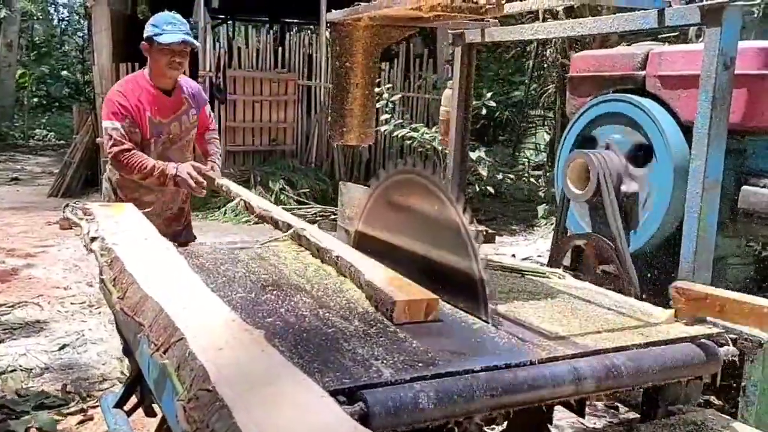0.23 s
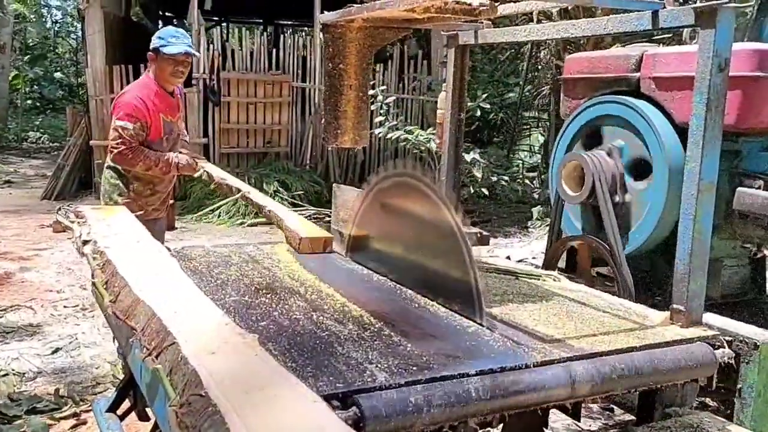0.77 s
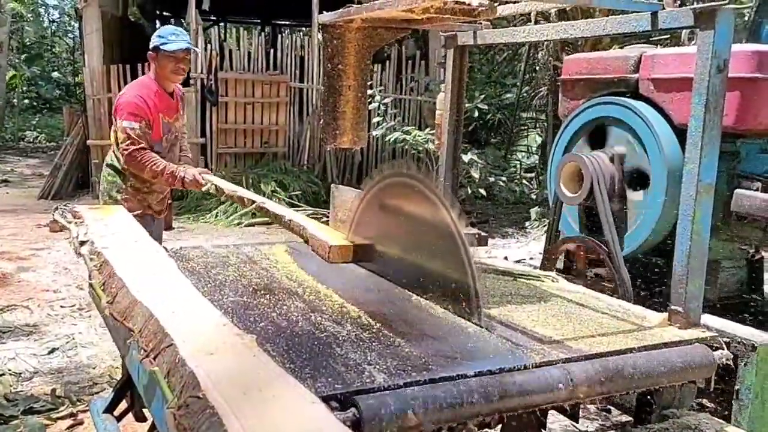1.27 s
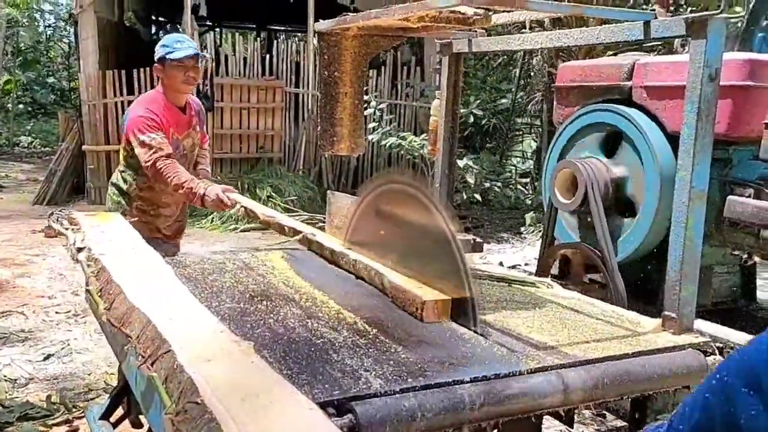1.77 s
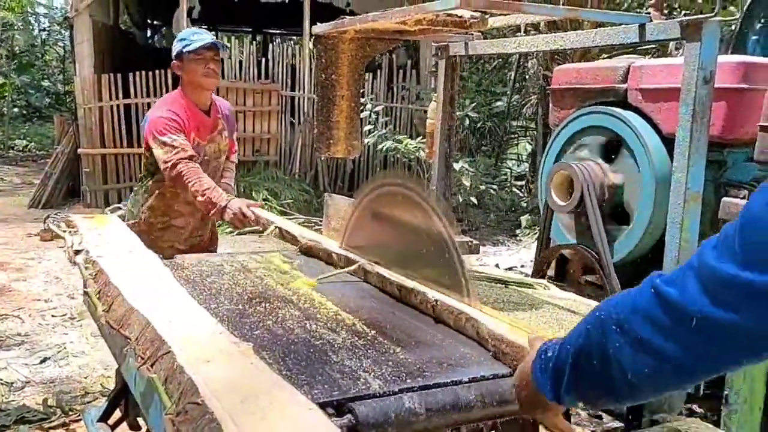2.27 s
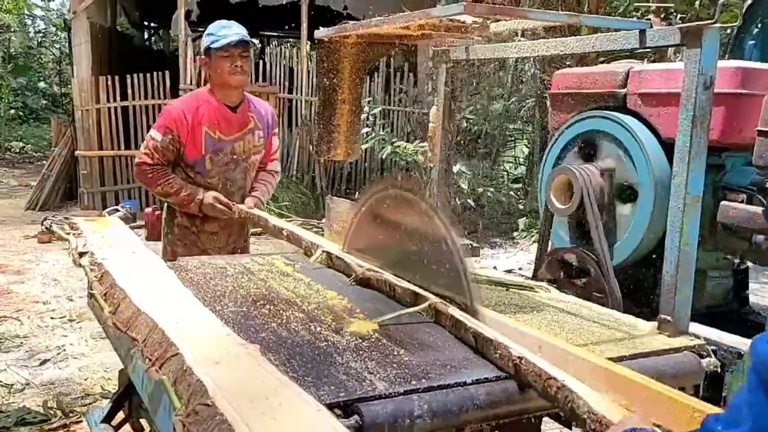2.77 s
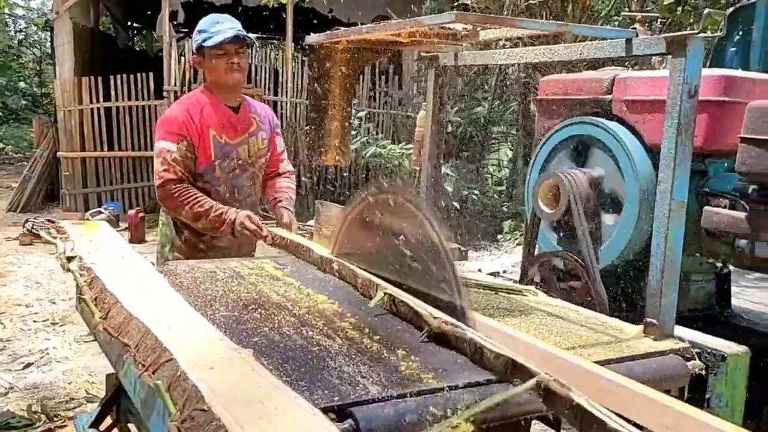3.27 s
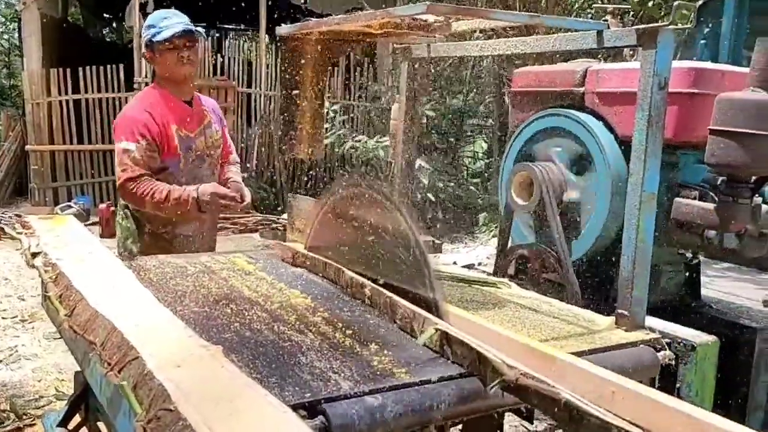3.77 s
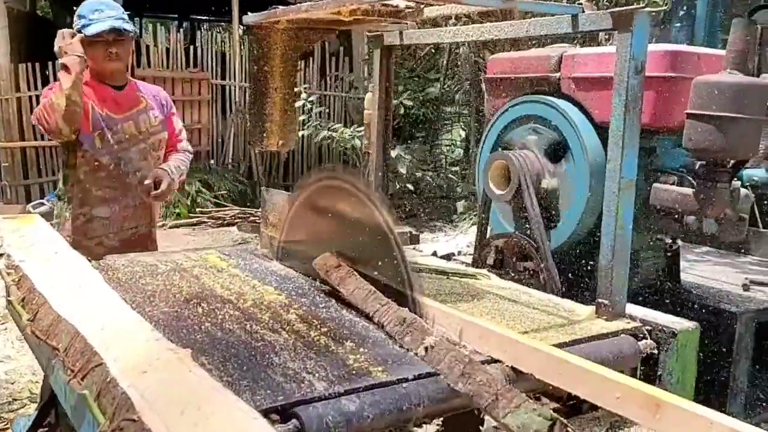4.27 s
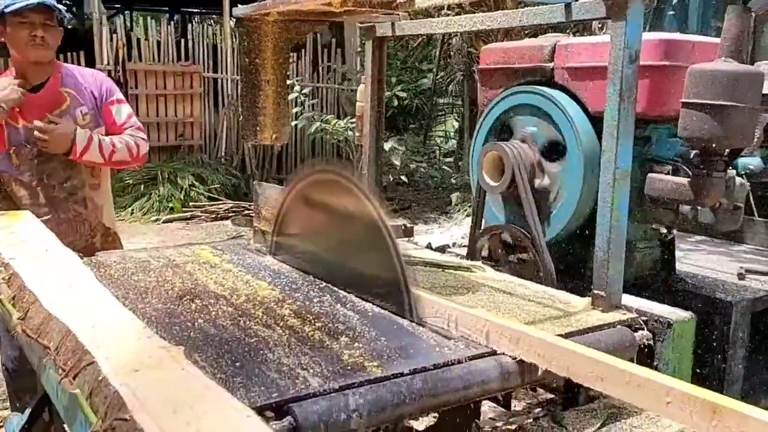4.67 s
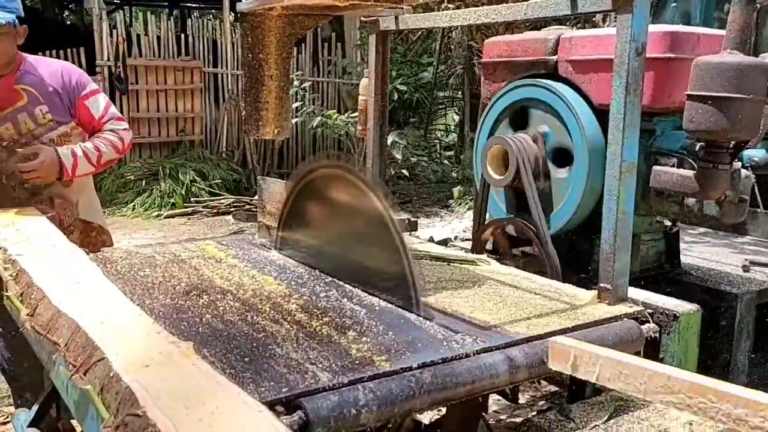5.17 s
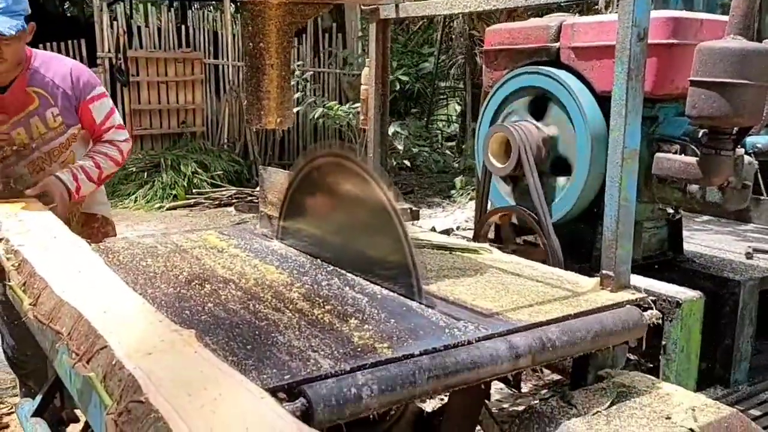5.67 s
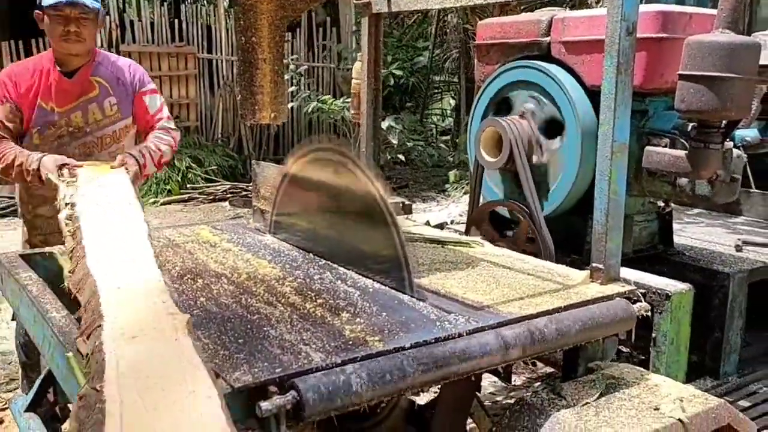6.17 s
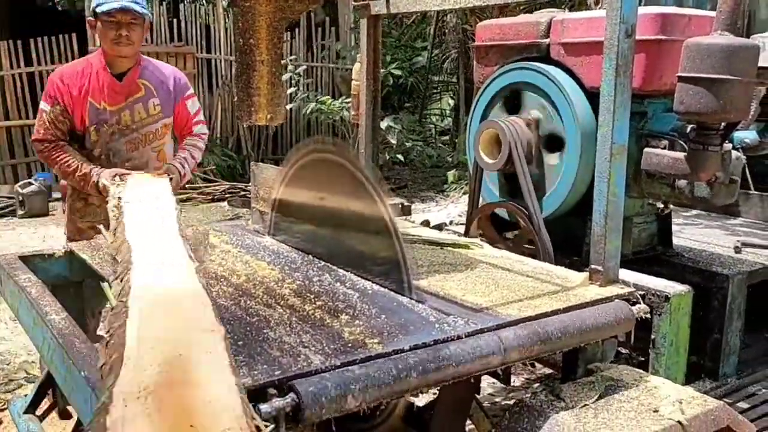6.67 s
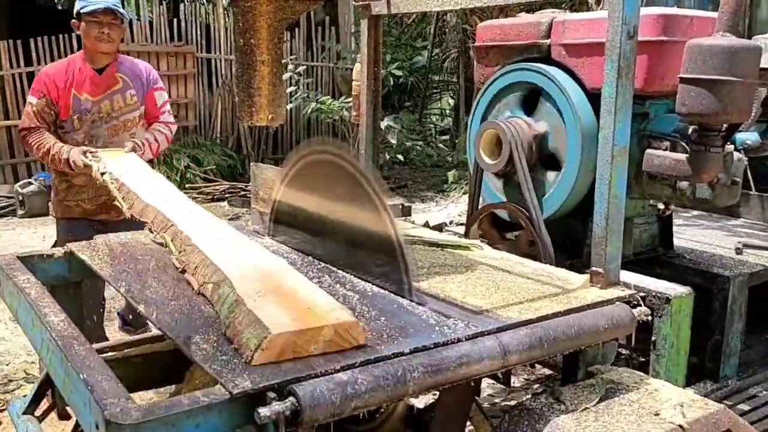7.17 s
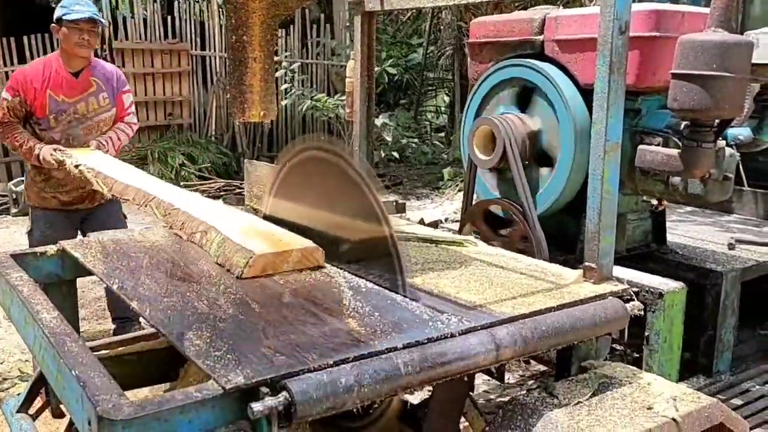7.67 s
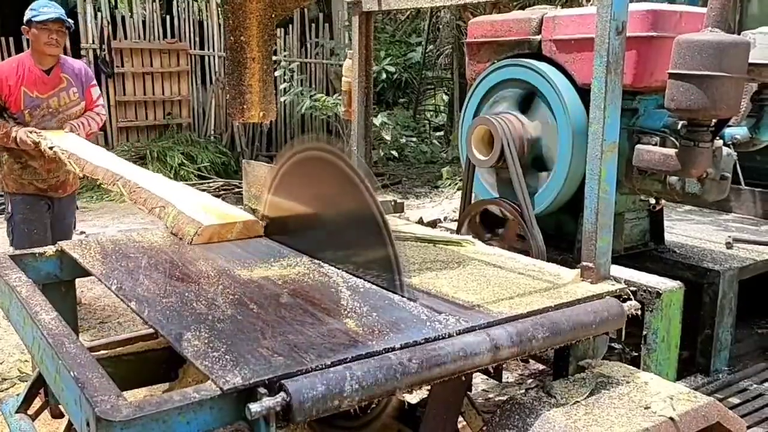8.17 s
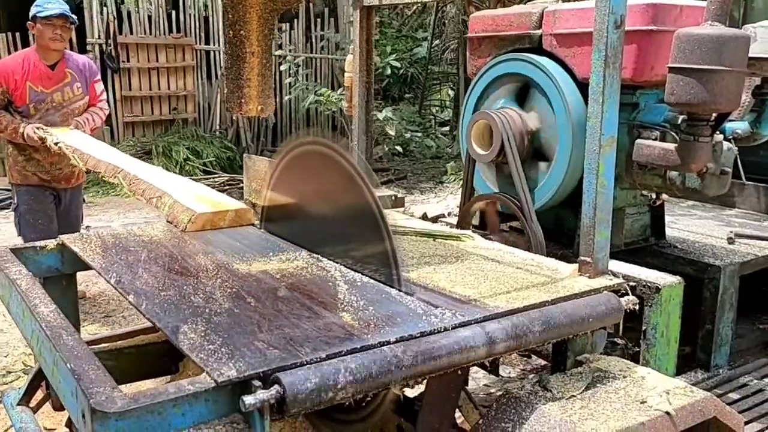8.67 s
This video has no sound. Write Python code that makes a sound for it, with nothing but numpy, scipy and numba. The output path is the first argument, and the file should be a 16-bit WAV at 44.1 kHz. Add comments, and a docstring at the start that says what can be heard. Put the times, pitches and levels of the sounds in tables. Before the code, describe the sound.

A stationary single-cylinder engine chugs throughout, about a dozen low puffs a second, broken by bursts of louder roaring bangs, with belt rush and metallic valve rattle. Soon after the start a circular saw bites timber, tearing with a bright metallic whine and fizzing dust for about three seconds. The engine then carries on alone; a slab end bumps the table late. Open air, close phone microphone, light wind rumble, levels squeezed after bangs.

```python
"""A one-cylinder engine coasts in the open air, puffing through its pipe and firing in bursts, heard by a phone.
Puffs ring the pipe; firings add a push and a roar of gas; belt, fan and valve gear clatter under them.
Its belt-driven circular saw rips a slab for three seconds: teeth click and ring the blade, and dust fizzes.
A slab end bumps the table late on, and wind buffets the microphone ports.
The phone's limiter ducks everything after loud bangs, and its right port is much brighter at first."""
import sys
import numpy as np
from scipy import signal
from scipy.fft import rfft, irfft, next_fast_len
from scipy.io import wavfile
from scipy.ndimage import uniform_filter1d
from numba import njit

SR = 44100
rng = np.random.default_rng(int(sys.argv[2]) if len(sys.argv) > 2 else 0)


def amplitude_ratio(level_db):
    """Convert a level in decibels to the matching linear amplitude (field) ratio."""
    exponent = np.asarray(level_db, float) / 20
    return 10 ** exponent


def bounce(signal):
    """Save signal as a 16-bit WAV file at the path given by the first command-line argument."""
    frames = np.transpose(np.atleast_2d(signal))
    limited = np.clip(frames, -1, 1)
    pcm = np.round(limited * 32767).astype(np.int16)
    wavfile.write(sys.argv[1], SR, pcm)


N = 393813
T = np.arange(N) / SR
HZ = np.arange(next_fast_len(N) // 2 + 1) * SR / next_fast_len(N)

# power strokes of the engine, and a few strokes with hardly any roar:
# start_s, blast_db (relative), roar_db (gas, relative to the blast)
STRONG_STROKES = [(0.264, 8.5, 3.5), (0.345, 15, -4.5), (0.446, 11.5, -19), (1.019, 16, -3), (1.126, 4, -8),
                  (1.713, 13.5, -1), (1.795, 13, -1), (2.093, 14.5, -3), (2.178, 16, -1.5), (2.235, 10, -6),
                  (2.316, 9, -24), (2.404, 14, -18), (2.552, 4, -15), (2.627, 16.5, -10), (2.7, 5, -14),
                  (2.841, 7, -19), (2.929, 12, -9), (3.157, 17, -13), (3.219, 8, -15), (3.309, 15, -5.5),
                  (3.604, 0, -15), (3.691, 12, -8.5), (3.753, 7, -2), (3.995, 1, -11), (4.067, 8.5, -3),
                  (4.138, 5, 7), (4.591, 14.5, 1), (4.652, 10.5, -6), (5.328, 12.5, -3.5),
                  (5.409, 19.5, -2), (5.491, 13.5, -11), (6.016, 16, -1.5), (6.094, 12.5, -2.5),
                  (6.153, 17.5, -1.5), (6.685, 14, 0), (6.767, 13.5, 2.5), (7.445, 16, 3), (7.517, 20, -4),
                  (8.192, 17.5, -1), (8.278, 17.5, -3)]
# lean of the engine across the two ports: frequency_hz, left_minus_right_db
ENGINE_LEAN = [(200, .3), (700, 1.2), (1290, 3.5), (2380, -1.5), (4000, 4.5), (5200, 0), (15000, 1)]
# lean of the saw across the two ports: frequency_hz, left_minus_right_db
SAW_LEAN = [(1000, 25), (3000, 4), (4500, 6), (5200, 9), (6300, 10)]


def spectrum(x):
    """Transform on the bins of HZ."""
    return rfft(x, next_fast_len(N))


def wave(bins):
    """Back to N samples."""
    return irfft(bins, next_fast_len(N))[:N]


def shape(x, response):
    """Filter by a frequency response."""
    return wave(spectrum(x) * response)


def level(x, db):
    """Scale to an rms level."""
    return x * amplitude_ratio(db) / np.sqrt(np.mean(x ** 2))


def curve(points):
    """A (Hz, value) table over all bins, straight on a log axis."""
    hz, value = np.transpose(points)
    return np.interp(np.log(HZ + 1), np.log(hz), value)


def ring(modes):
    """Summed response of (Hz, width Hz, dB) resonances; the loss of bolted joints widens each."""
    hz, width, db = np.transpose(modes)
    width = np.hypot(width, 50)
    return sum(amplitude_ratio(g) * 1j * HZ * w / (f * f - HZ * HZ + 1j * HZ * w)
               for f, w, g in zip(hz, width, db))


def strike(times, db, kernel):
    """The kernel once at each time."""
    train = np.zeros(N)
    at = np.clip((np.asarray(times) * SR).astype(int), 0, N - 1)
    np.add.at(train, at, amplitude_ratio(db))
    return signal.fftconvolve(train, kernel)[:N]


def walk(rate):
    """Random levels held 1 / rate s and slewed twice; spread near 1."""
    k = int(SR / rate)
    steps = np.repeat(rng.standard_normal(N // k + 1), k)
    return 1.58 * uniform_filter1d(uniform_filter1d(steps, k), k)[:N]


def grit(rate, spread_db):
    """Noise of rms 1 from random ticks of uneven size, rate per second."""
    ticks = (rng.random(N) < rate / SR) * rng.standard_normal(N)
    ticks = ticks * amplitude_ratio(spread_db * rng.exponential(size=N))
    return level(ticks, 0)


def ports(make, response, lean, left_lag_s):
    """One straight arrival at both ports, a little apart in time, plus scattered sound that differs at each."""
    # share of the power that arrives straight: frequency_hz, share
    straight_share = [(100, .99), (300, .98), (700, .85), (1500, .7), (4000, .6), (15000, .5)]
    share = np.clip(curve(straight_share), 0, 1)
    straight = spectrum(make()) * np.sqrt(share)
    sides = []
    for sign in (1, -1):
        delay = np.exp(-1j * np.pi * HZ * sign * left_lag_s)
        scattered = spectrum(make()) * np.sqrt(1 - share)
        both = straight * delay + scattered
        sides.append(wave(both * response * amplitude_ratio(sign * curve(lean) / 2)))
    return np.array(sides)


def exhaust(puff_s, puff_db):
    """Coasting strokes ring the pipe; a firing adds a pressure push, two echoes and a short roar of gas."""
    # resonances of the pipe: frequency_hz, width_hz, level_db (relative)
    pipe_modes = [(261.2, 73.2, 14.5), (615, 41, 0), (203, 94, 8.5), (46, 67, 1.5)]
    # the two pitches of the valve's bark: pitch_hz
    bark_hz = (1082, 1234)
    # colour of the gas roar: frequency_hz, level_db (relative)
    roar_colour = [(200, -18), (600, 20), (1300, 23.5), (2800, 19.5), (4300, 26), (5400, 15), (6500, 6.5),
                   (8000, 2), (14000, -9.5), (15500, -38)]
    t = T[:SR // 10]
    fire_s, fire_db, roar_db = np.transpose(STRONG_STROKES)

    pipe = sum(-amplitude_ratio(db) * np.sin(2 * np.pi * hz * t) * np.exp(-np.pi * width * t)
               for hz, width, db in pipe_modes)
    # the valve lifts gradually and soon chokes the ring
    pipe = 4.5 * pipe * (1 - np.exp(-t / 0.005)) ** 2 * np.exp(-(t / 0.016) ** 3)
    puffs = strike(puff_s + 0.0016, puff_db, amplitude_ratio(5.0) * pipe)
    # the pipe answers again, at one strength, when the valve closes
    closing = strike(np.r_[puff_s, fire_s] + .0226, -3, pipe)
    # the intake gulps air ahead of each coasting stroke: one cycle
    gulp = strike(puff_s - .023, puff_db - 1, np.sin(2 * np.pi * 110 * t) * (t < 1 / 110))
    # the valve snaps open with a short bark in the midrange
    bark = sum(np.sin(2 * np.pi * hz * t) for hz in bark_hz) * t / 0.0059 * np.exp(1 - t / 0.0065)
    barks = strike(puff_s - .006, puff_db - 2.0, bark)

    # a push of pressure, then a weaker pull that dies away
    push = np.sin(np.pi * np.clip(t / 0.0031, 0, 1))
    push = push - 0.5 * np.clip((t - .0027) / 0.001, 0, 1) * np.exp(-(t - .004) / 0.0045)
    thump = strike(fire_s, fire_db + 3.5, push)
    thump = thump + strike(fire_s + 0.0117, fire_db - 7.0, push)
    thump = thump + strike(fire_s + 0.0273, fire_db - 6.0, push)

    gas = (1 - np.exp(-t / 0.0022)) * np.exp(-(t / 0.015) ** 3)
    gate = strike(fire_s + 0.0012, fire_db + roar_db - 5.0, gas)
    # a sharp crack rides each blast and echoes once
    crack = (1 - np.exp(-t / 0.001)) * np.exp(-t / 0.0022)
    gate = gate + strike(fire_s + 0.0022, fire_db + roar_db + 3.5, crack)
    gate = gate + strike(fire_s + 0.0133, fire_db + roar_db - 12, crack)
    colour = amplitude_ratio(curve(roar_colour))
    colour = colour / np.sqrt(np.mean(colour ** 2))
    roar = ports(lambda: gate * rng.standard_normal(N), colour, ENGINE_LEAN, 0.00018)

    lows = puffs + gulp + barks + closing + thump
    # the pipe is nearer the right port in time, a little louder left
    lows = np.array([amplitude_ratio(.8) * np.interp(T - .00018, T, lows), lows])
    return lows + amplitude_ratio(7.0) * roar


def clatter(puff_s):
    """Belt and fan rush, surging with each stroke; valve gear rattles the block and the thin covers."""
    # colour of the rush: frequency_hz, level_db per Hz (relative)
    rush_colour = [(60, -17.5), (180, -0.5), (290, -6), (385, -2.5), (600, -4), (1250, -5), (2300, -11),
                   (3100, -11), (4000, -7), (5450, -18.5), (7030, -27), (8090, -41), (10700, -35),
                   (13800, -37), (15000, -34), (15500, -62)]
    # what the valve gear rings in the block: frequency_hz, width_hz (before joint loss), level_db (relative)
    block_modes = [(627, 93, -4.5), (765, 31, 4.5), (1084, 9.4, 2), (1257, 140, 3.5), (1695, 83, 2.5)]
    # thin covers: frequency_hz, width_hz (before joint loss), level_db (relative)
    cover_modes = [(3590, 33, 12), (3803, 49, 9.5), (3995, 53, 11.5), (4100, 63, 8), (4280, 100, 2.5),
                   (4517, 80, 4.5), (5050, 260, -2.5), (5950, 110, 0.5), (6740, 170, -0.5)]
    t = T[:SR // 10]
    strokes = np.r_[puff_s, np.array(STRONG_STROKES)[:, 0]]
    surge_db, tappet_db, valve_db = 2 * rng.standard_normal((len(strokes), 3)).T

    surge = strike(strokes - .012, surge_db, t / 0.047 * np.exp(1 - t / 0.025))
    tappet = strike(strokes - .008, tappet_db - 1, t / 0.0048 * np.exp(1 - t / 0.0037))
    # one valve seats well before the stroke, the other close to it
    seat = t / 0.0063 * np.exp(1 - t / 0.0043)
    valves = strike(strokes - .022, valve_db - 0.5, seat)
    valves = valves + strike(strokes - .007, tappet_db - 11.5, seat)

    def rushing():
        return (1 + .5 * surge) * amplitude_ratio(1.21 * walk(25)) * rng.standard_normal(N)

    rush = ports(rushing, amplitude_ratio(curve(rush_colour)), ENGINE_LEAN, 0.00011)
    block = rattle(0.61 + tappet, block_modes, 1.0)
    # three groups of covers rattle independently
    covers = sum(rattle(1.1 + valves, cover_modes[k::3], -2.5) for k in range(3))
    return level(rush, 5.2) + block + covers


def rattle(push, modes, db):
    """Dense ticks in clumps ring one part; rounded contacts carry little treble."""
    clumps = push * amplitude_ratio(2.8 * walk(45))
    blunt = 1 / (1 + (HZ / 6500) ** 6)

    def ticks():
        return clumps * grit(1200, 1.5)

    return level(ports(ticks, ring(modes) * blunt, ENGINE_LEAN, 0.00019), db)


def saw():
    """Teeth tear fibres in uneven clicks that ring the blade; flying dust fizzes on top."""
    # level of the sawing over time: time_s, bite_db (relative), fizz_db (relative to the bite)
    sawing = [(1.3, -14, -33), (1.38, 8.5, -14), (1.46, 14, -18), (1.55, 13, -18), (2.0, 13, -23.5),
              (2.3, 7, -22.5), (2.62, 11.5, -19.5), (2.88, 8.5, -19), (3.1, 15.5, -21), (3.28, 11, -22),
              (3.52, 8.5, -19.5), (3.78, 2, -22), (3.9, 6, -20), (4.0, 7, -20), (4.1, 0.5, -17),
              (4.2, 4, -20), (4.3, -28, -39), (4.45, -26, -21)]
    # colour of the tearing: frequency_hz, level_db (relative)
    kerf_colour = [(600, -16.5), (2000, -1), (3000, 0.5), (4600, 4.5), (5300, 4), (6200, 0), (7400, -15.5),
                   (9000, -31)]
    # colour of the dust: frequency_hz, level_db (relative)
    dust_colour = [(6500, -18), (8000, 1.5), (10000, 6.5), (12000, 2.5), (14000, 5.5), (14900, -6),
                   (15400, -25)]
    s, bite_db, fizz_db = np.transpose(sawing)
    engaged = np.interp(T, [s[0], s[0] + .06, s[-1] - .15, s[-1]], [0, 1, 1, 0])
    grain_db = 1.1 * walk(150)
    bite = engaged * amplitude_ratio(np.interp(T, s, bite_db) + grain_db)

    def tearing():
        return grit(2500, 0.87) + rng.standard_normal(N)

    tear = ports(tearing, amplitude_ratio(curve(kerf_colour)), SAW_LEAN, -0.00013)
    dust = np.array([shape(grit(9600, 1), amplitude_ratio(curve(dust_colour))) for _ in range(2)])
    fizz = amplitude_ratio(np.interp(T, s, fizz_db)) * level(dust, -0.84)
    return bite * (level(tear, -3.5) + level(blade(), -2.5) + fizz)


def blade():
    """Each blade mode swells and fades by itself as the grain of the wood changes."""
    # modes of the blade: frequency_hz, width_hz (before joint loss), level_db (relative)
    blade_modes = [(3300, 250, -8), (3800, 180, -6), (4190, 100, -3), (4430, 120, -2), (4620, 100, 0),
                   (4830, 110, 0), (5000, 100, 0), (5160, 90, 0)]
    sound = 0
    # little rings above the highest mode
    edge = 1 / (1 + (HZ / 5300) ** 30)
    for mode in blade_modes:
        swell = amplitude_ratio(3 * walk(45))
        clicks = lambda: swell * grit(4000, 0.25)
        sound = sound + ports(clicks, ring([mode]) * edge, SAW_LEAN, -0.00019)
    return sound


def knock():
    """A slab end bumps the table: a short noise burst rings two broad, dulled resonances."""
    t = T[:SR // 20]
    burst = rng.standard_normal(len(t)) * np.exp(-t / .004)
    table = ring([(1520, 2000, -13.5), (3240, 1200, -36.0)]) / (1 + (HZ / 5000) ** 6)
    tick = shape(np.r_[burst, np.zeros(N - len(t))], table)
    return strike([7.932], 42.4, tick[:len(t)])


def wind():
    """Low buffeting, nearly alike on both ports."""
    # level of the wind over time: time_s, level_db (relative)
    wind_level = [(0, 1), (.8, -6), (1.3, -2.5), (1.5, -15), (3.8, -30), (4.5, -28), (7.3, -30), (7.7, -9),
                  (8.1, -21), (8.5, -1), (8.93, -4)]
    s, db = np.transpose(wind_level)
    low = amplitude_ratio(curve([(15, -9), (35, 13.0), (100, 10.0), (200, -2), (400, -56)]))
    mid, side = (level(shape(rng.standard_normal(N), low), 0) for _ in range(2))
    gust_db = 1.0 * walk(8)
    return amplitude_ratio(np.interp(T, s, db) + gust_db) * (mid + 0.06 * side * np.array([[1], [-1]]))


def scene():
    """Everything at the phone; a band of the machines near 390 Hz is weak."""
    # coasting strokes, each a puff from the pipe, at uneven spacing: start_s, level_db (relative)
    coasting = [(0.061, 2.5), (0.144, 2), (0.221, 1), (0.506, 2.5), (0.588, 3), (0.669, 2), (0.738, 4),
                (0.822, 2.5), (0.894, 0), (0.951, 0), (1.198, -0.5), (1.27, 3), (1.345, 2), (1.413, -7),
                (1.488, 0), (1.575, -1.5), (1.634, 2), (1.87, -8), (1.955, -6), (2.027, -2), (2.257, -7),
                (2.34, 2), (2.481, -1), (2.552, -6), (2.721, -11), (2.783, -4), (2.84, 0), (3.01, -1),
                (3.096, 1.5), (3.22, -8), (3.4, -20), (3.481, -15), (3.544, -8), (3.602, -7), (3.858, -2.5),
                (3.934, -1.5), (3.993, -7), (4.228, -0.5), (4.31, 1), (4.385, 1.5), (4.447, 2),
                (4.529, -4.5), (4.672, -6), (4.754, 4), (4.835, -0.5), (4.891, 0), (4.973, 0), (5.055, 3),
                (5.129, 3), (5.208, 1), (5.273, -12), (5.572, -3), (5.655, 4), (5.735, 0.5), (5.8, 4.5),
                (5.885, 3), (5.956, 1), (6.176, 3), (6.256, 3.5), (6.336, 3), (6.397, 2.5), (6.481, 3.5),
                (6.564, 3.5), (6.624, 2), (6.854, 3), (6.927, 1.5), (7.007, 1), (7.068, 0), (7.152, 2),
                (7.235, 2), (7.3, 1), (7.385, 1.5), (7.598, 1), (7.682, 2), (7.762, -2), (7.84, 2),
                (7.902, -1.5), (7.985, 4), (8.056, -1), (8.141, -2), (8.366, -0.5), (8.437, -0.5),
                (8.519, -2.5), (8.581, -1), (8.665, 3.5), (8.741, 4), (8.803, -11), (8.888, 1)]
    puff_s, puff_db = np.transpose(coasting)
    machines = clatter(puff_s) + exhaust(puff_s, puff_db) + saw() + knock()
    notch = 1 - .7 * ring([(386.0, 179, 0)])
    machines = np.array([shape(side, notch) for side in machines])
    return amplitude_ratio(-19.0) * (machines + wind())


@njit
def follow(x, attack, release):
    """Level follower: separate shares of the gap closed per sample, going up and coming down."""
    env, e = np.empty(len(x)), x[:4000].mean()
    for i in range(len(x)):
        e += (x[i] - e) * (attack if x[i] > e else release)
        env[i] = e
    return env


def low_pass(x):
    """Removes everything above the highest recorded frequency."""
    return signal.sosfilt(signal.butter(12, 15720, fs=SR, output="sos"), x)


def record(dry):
    """Bright right port at first, then a slow gain control and a fast limiter shared by both channels."""
    # colour of the bright right port: frequency_hz, gain_db
    bright_port = [(300, -1.5), (1200, -0.5), (2000, 6), (3000, 17), (4000, 12), (5000, 18), (5250, 18),
                   (5400, 15), (5900, 10.5), (6400, 0.5), (8000, 1.5), (14000, 4.5)]
    bright_until_s, bright_fade_s = 3.905, .12
    early = np.clip((bright_until_s - T) / bright_fade_s, 0, 1)
    right = early * shape(dry[1], amplitude_ratio(curve(bright_port))) + (1 - early) * dry[1]
    sound = np.array([dry[0], right])

    # slow gain control: 0.12 s up, 0.45 s down
    slow = follow(np.abs(sound).max(axis=0), 1 / (.12 * SR), 1 / (.45 * SR))
    sound = sound * (amplitude_ratio(-17.0) / slow) ** 0.76

    # limiter: 0.48 ms up, 80 ms down, looking 2.4 ms ahead
    fast = follow(np.abs(sound).max(axis=0), 1 / (0.00048 * SR), 1 / (.08 * SR))
    fast = np.interp(T + 0.0024, T, fast)
    sound = sound * np.minimum(amplitude_ratio(-10.0) / fast, 1) ** 0.78

    sound = signal.sosfilt(signal.butter(1, 12, "highpass", fs=SR, output="sos"), sound)
    return low_pass(sound)


dry = scene()
out = record(dry)
bounce(out)
```